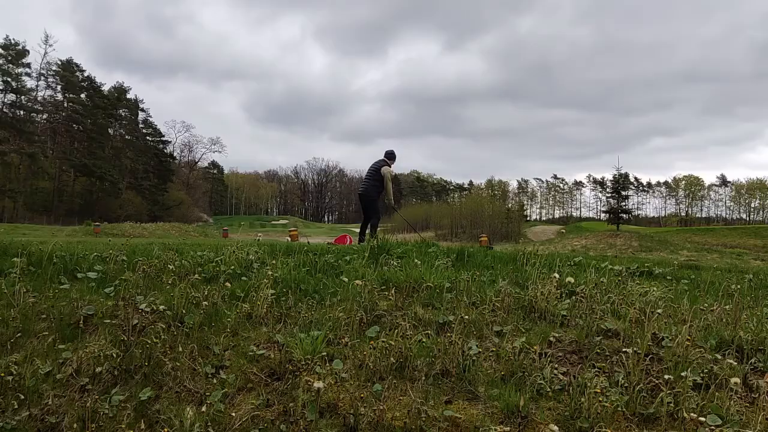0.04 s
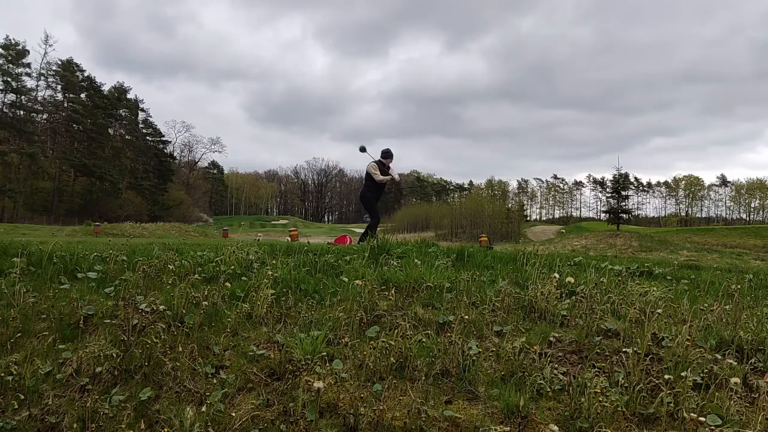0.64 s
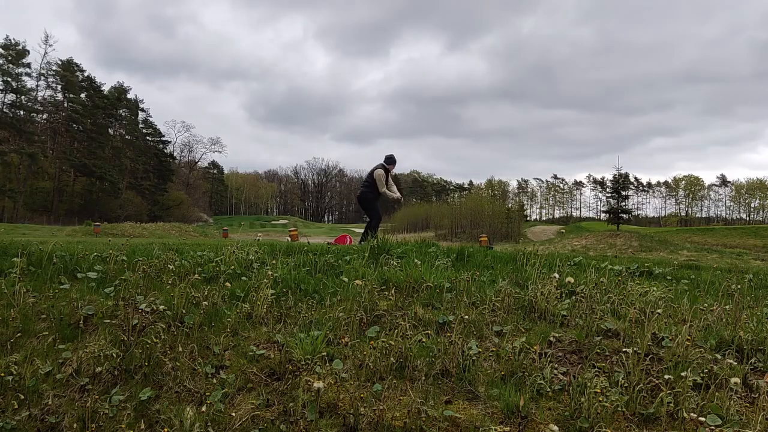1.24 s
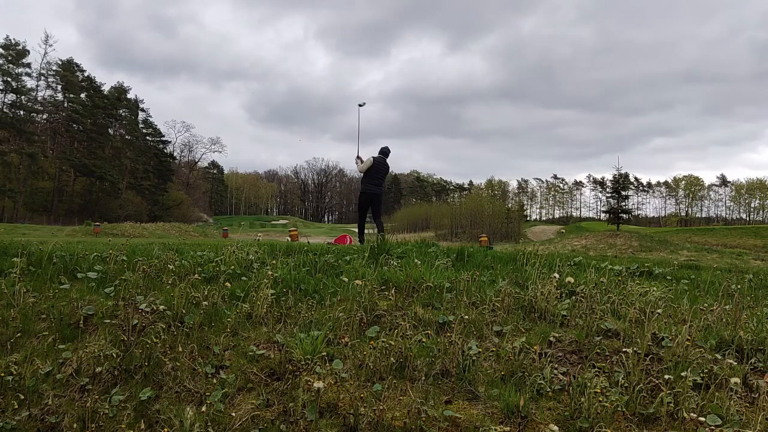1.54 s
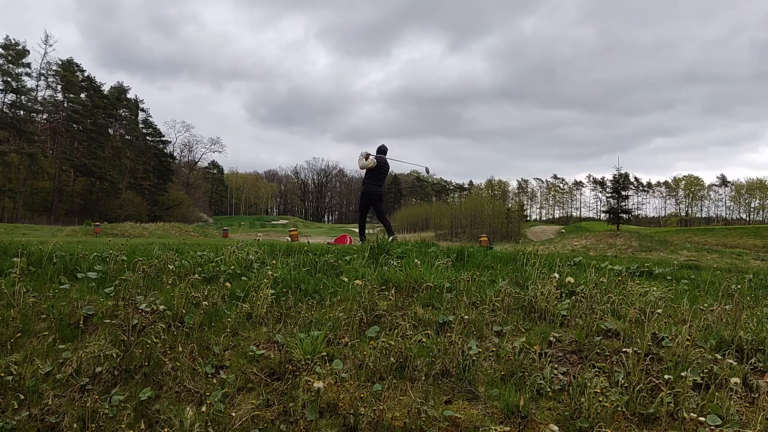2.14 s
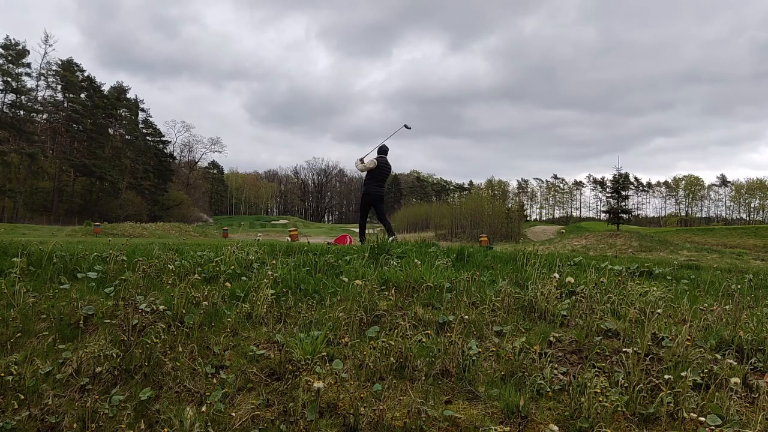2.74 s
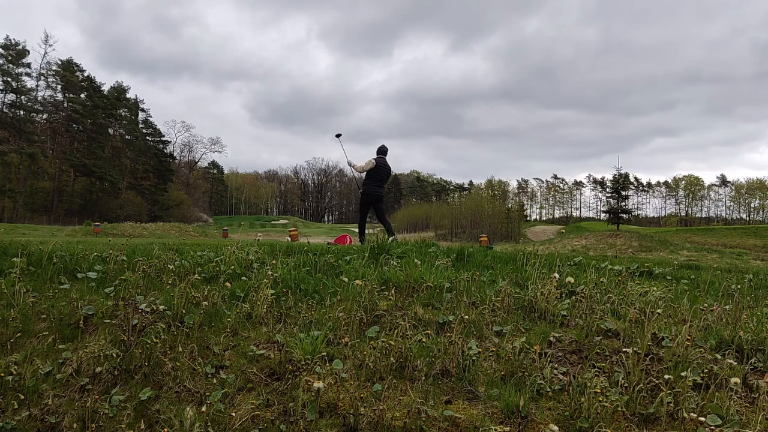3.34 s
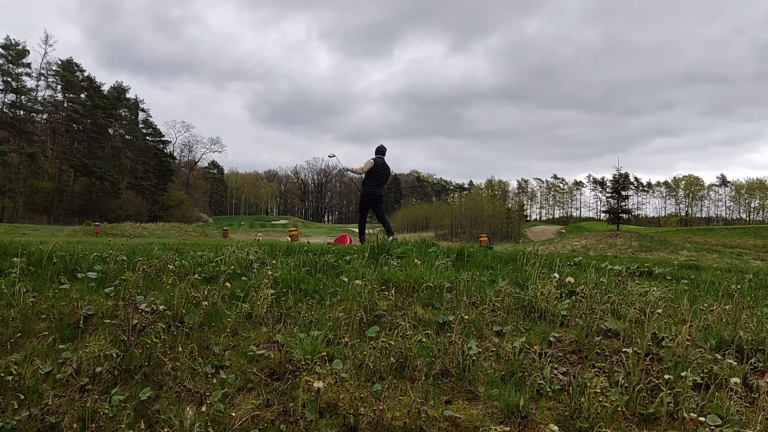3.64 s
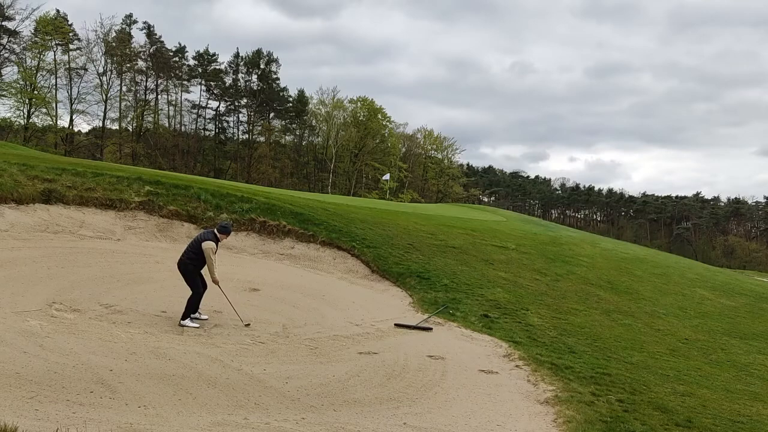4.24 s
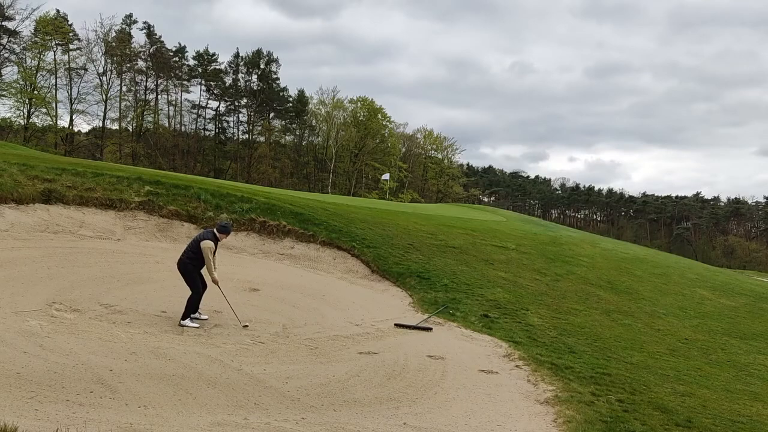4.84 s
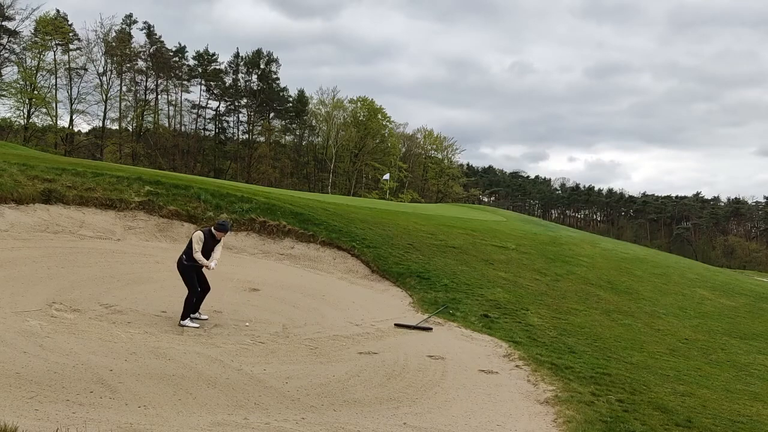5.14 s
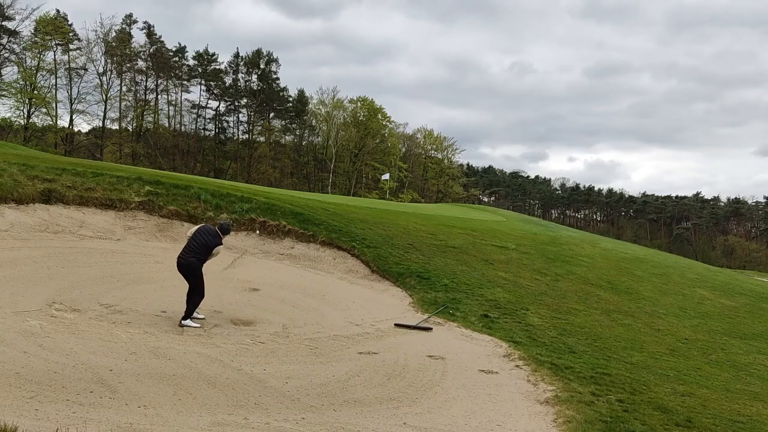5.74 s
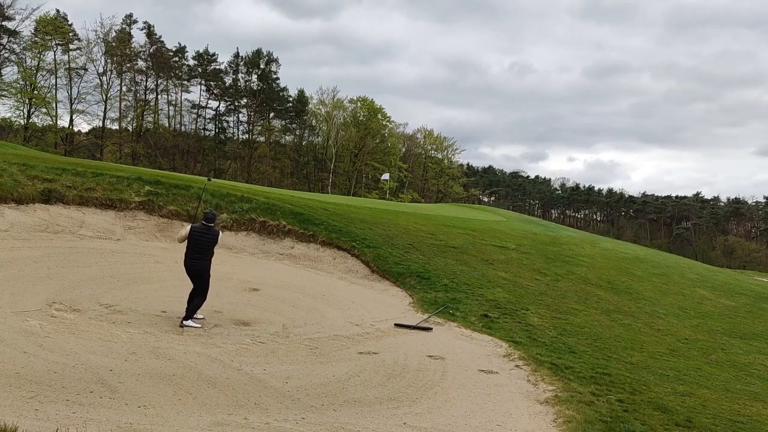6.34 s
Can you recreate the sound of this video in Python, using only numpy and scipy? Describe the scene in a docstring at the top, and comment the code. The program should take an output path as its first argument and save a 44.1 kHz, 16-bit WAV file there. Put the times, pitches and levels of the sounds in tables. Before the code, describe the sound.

Over quiet outdoor air and light birdsong, a short club whoosh leads into the sharp crack of a golf drive, with a brief ring and an echo from nearby woods. Birds pipe and buzz afterwards. The sound then switches suddenly to a bunker, where low gusts buffet the microphone, a bird whistles once, and a quieter wedge shot scatters sand. Clothing rustles softly with both swings.

```python
"""Two golf shots near woods.

At the tee, small birds sing while a driver whooshes down and cracks the ball; its hollow head
rings and the trees scatter the crack back. The scene then cuts to a bunker, where wind buffets
the microphone and a wedge knocks the ball out in a spray of sand. Clothes swish with each swing."""
import sys
import numpy as np
from scipy import signal
from scipy.fft import rfft, irfft, next_fast_len
from scipy.io import wavfile
from scipy.ndimage import uniform_filter1d

SR = 44100
rng = np.random.default_rng(int(sys.argv[2]) if len(sys.argv) > 2 else 0)


def unload_audio(sound):
    """Save the sound as a 16-bit wav file, at the path given as the first command line argument."""
    columns = np.transpose(np.atleast_2d(sound))
    # keep every value between -1 and 1, then stretch to whole-number steps
    steps = np.round(np.clip(columns, -1, 1) * 32767)
    wavfile.write(sys.argv[1], SR, steps.astype(np.int16))


N = 281342
TIME_S = np.arange(N) / SR
FFT_SIZE = next_fast_len(N, real=True)
BIN_HZ = np.fft.rfftfreq(FFT_SIZE, 1 / SR)
DRIVE_S, CUT_S, WEDGE_S = 1.4131, 4.09, 5.7351


def amp(db):
    """Decibels to gain."""
    return 10 ** (np.asarray(db) / 20)


def unit_rms(x):
    """Scales to rms 1."""
    return x / np.sqrt(np.mean(x ** 2) + 1e-20)


def curve_at(points, hz):
    """Interpolates a table on a log-frequency axis."""
    point_hz, value = np.transpose(points)
    return np.interp(np.log(hz + 1), np.log(point_hz + 1), value)


def pan(left_db):
    """Stereo gains for a left-over-right level difference."""
    gains = amp(np.array([[.5], [-.5]]) * left_db)
    return gains / np.sqrt(np.mean(gains ** 2, axis=0))


def noise(spectrum, correlation=0):
    """Stereo noise of rms 1 with a given spectrum and left-right correlation."""
    left, spare = rng.standard_normal((2, FFT_SIZE))
    right = correlation * left + np.sqrt(1 - correlation ** 2) * spare
    shaped = rfft([left, right]) * amp(curve_at(spectrum, BIN_HZ))
    return unit_rms(irfft(shaped, FFT_SIZE)[:, :N])


def burst(peak_s, rise_s, fall_s):
    """Envelope that grows and dies exponentially about its peak."""
    return np.exp(-np.maximum((peak_s - TIME_S) / rise_s, (TIME_S - peak_s) / fall_s))


def place(x, start_s):
    """Puts a mono sound on the timeline."""
    return np.pad(x, (round(start_s * SR), N))[:N]


def pulse(spectrum, start_s, size=8192):
    """One minimum-phase pressure pulse of peak 1."""
    log_gain = np.log(amp(curve_at(spectrum, abs(np.fft.fftfreq(size, 1 / SR)))))
    shape = np.fft.ifft(np.exp(np.conj(signal.hilbert(log_gain)))).real
    return place(shape / abs(shape).max(), start_s)


def ring(modes, strike_s):
    """Struck modes decay, reaching each channel in a random phase."""
    age_s = TIME_S - strike_s
    live = (age_s > 0) & (age_s < 1)
    out, t = np.zeros((2, N)), age_s[live]
    for hz, db, t60_s in modes:
        out[:, live] += amp(db - 60 * t / t60_s) * np.sin(2 * np.pi * (hz * t + rng.random((2, 1))))
    return out


# Open-air spectra at the two spots. Each row: frequency in Hz, relative level in dB.
TEE_AIR_SPECTRUM = [(12, -30.5), (20, 5), (33, -13), (66, -11.5), (161, -23.5), (196, -27.5), (231, -25.5),
                    (389, -29), (471, -28.5), (620, -30.5), (1860, -38.5), (4360, -39.3), (7340, -42),
                    (8900, -38), (14200, -43)]
BUNKER_AIR_SPECTRUM = [(100, 13), (400, 10), (1000, 2.5), (2500, -1), (5000, -2.3), (7500, -4), (8700, 0),
                       (9800, -3.5), (11000, -0.5), (12500, -3.5), (14200, -7)]


def open_air():
    """Steady background noise, as a pair: tee, bunker."""
    return (amp(-57.7) * noise(TEE_AIR_SPECTRUM, correlation=.2),
            amp(-66) * noise(BUNKER_AIR_SPECTRUM, correlation=.087))


# Gusts. Each row: peak time in seconds, half length in seconds, level in dB, left over right in dB.
WIND_GUSTS = [(4.14, .06, -43, 18), (4.34, .07, -49, 14), (4.44, .06, -48.5, -9), (4.72, .13, -49.5, -3),
              (4.855, .02, -49, -4), (5.037, .03, -44, 10), (5.48, .13, -48, -16), (5.78, .13, -51, 1),
              (6.055, .06, -40.5, 23), (6.21, .07, -40.5, 12)]
# Wind on the microphone. Each row: frequency in Hz, relative level in dB.
BUFFET_SPECTRUM = [(10, -5), (25, 3.5), (55, -1.5), (100, -12), (160, -21.5), (250, -34), (500, -69),
                   (1500, -78)]


def wind(breeze_db=-56, eddy_db=1.2):
    """A breeze and gusts, broken into short eddies, buffet each microphone port separately."""
    power = amp(breeze_db) ** 2
    for peak_s, half_s, db, left_db in WIND_GUSTS:
        power = power + (amp(db) * pan(left_db)) ** 2 * np.exp(-((TIME_S - peak_s) / half_s) ** 2)
    eddies = uniform_filter1d(rng.standard_normal((2, N)), size=1500)
    eddies = unit_rms(uniform_filter1d(eddies, size=900))
    return np.sqrt(power) * unit_rms(amp(eddy_db * eddies) * noise(BUFFET_SPECTRUM))


# Echo colour. Each row: frequency in Hz, relative level in dB.
ECHO_SPECTRUM = [(100, -13), (300, -12.5), (650, -8.5), (1200, -14.7), (2400, -4), (4000, 3.2), (6300, 2.8),
                 (9000, 3.3), (11000, -3.5), (14000, -6)]
# Echo decay. Each row: frequency in Hz, T60 in seconds.
ECHO_DECAY = [(200, .9), (600, .72), (1200, 1), (3000, 1), (5000, 0.74), (8000, .53), (13000, 0.56)]
# Echo balance. Each row: frequency in Hz, left over right in dB.
ECHO_PAN = [(600, 0), (4000, 0.5), (8000, -6), (11000, -1.5), (14000, 5)]


def woods(x, delay_s=.013, build_s=.003, clump_db=2, bank_s=.031):
    """Trunks and turf scatter a sound into a tail of clumped echoes, whose treble dies first."""
    hz, t, bins = signal.stft(rng.standard_normal((2, SR)), SR, nperseg=256)
    clumps = uniform_filter1d(rng.standard_normal(bins.shape[1:]), size=3, axis=1)
    clumps = unit_rms(uniform_filter1d(clumps, size=24, axis=0))
    colour = amp(curve_at(ECHO_SPECTRUM, hz)) * pan(curve_at(ECHO_PAN, hz))
    decay_db = 60 * t / curve_at(ECHO_DECAY, hz)[:, None]
    bins = bins * colour[:, :, None] * amp(clump_db * clumps - decay_db)
    tail = signal.istft(bins, SR, nperseg=256)[1][:, :SR]
    age_s = TIME_S[:SR]
    tail *= 1 - np.exp(-np.maximum(age_s - delay_s, 0) / build_s)
    # The nearest bank, on the right, throws back one stronger cluster.
    tail *= 1 + amp(-7.5) * pan(-20) * np.exp(-((age_s - bank_s) / .01) ** 2)
    return signal.oaconvolve(x, tail / np.sqrt(SR / 20), axes=1)[:, :N]


def whistle(start_s, hz, level, buzz=0, rasp=0, buzz_hz=372):
    """A bird's tone along a pitch curve; a fast, even wobble makes it buzz, an uneven one rasp."""
    t = TIME_S[:len(hz)]
    waver = unit_rms(uniform_filter1d(rng.standard_normal(len(t)), size=70))
    hz = hz * (1 + buzz * np.sin(2 * np.pi * buzz_hz * t) + rasp * waver)
    return place(np.sqrt(2) * level * np.sin(2 * np.pi * np.cumsum(hz) / SR), start_s)


def note(start_s, length_s, hz, db, glide=0, arch=0, buzz=0, rasp=0, skew=1):
    """A bird's note swells and fades as its pitch glides and arches; skew above 1 delays the swell."""
    progress = np.linspace(0, 1, round(length_s * SR))
    centred = 2 * progress - 1
    pitch_hz = hz * (1 + glide * centred / 2 - arch * centred ** 2)
    return whistle(start_s, pitch_hz, amp(db) * np.sin(np.pi * progress ** skew), buzz, rasp)


def perch(song, left_db, echo_db):
    """Places a bird to one side, with its echo from the trees."""
    return song * pan(left_db) + amp(echo_db) * woods(song[None], delay_s=.003)


def twitter(start_s, end_s, low_hz, top_db, count):
    """One bout of short bird notes, random in timing, pitch, glide and level."""
    jitter, pitch, slope, softness = rng.random((count, 4)).T
    times_s = start_s + (end_s - start_s) * (np.arange(count) + jitter) / count
    notes = zip(times_s, low_hz * (1 + .25 * pitch), top_db - 6 * softness, .4 * (slope - .5))
    return sum(note(s, .035, hz, db, glide, buzz=.05, rasp=.03) for s, hz, db, glide in notes)


def treetop_birds():
    """Far birds twitter in bouts, with a strong echo."""
    song = (twitter(0, .6, low_hz=3600, top_db=-74, count=7)
            + twitter(.6, 1.35, low_hz=3650, top_db=-70, count=14)
            + twitter(3.55, 4.02, low_hz=3550, top_db=-68, count=10)
            + twitter(4.1, 4.36, low_hz=2850, top_db=-72, count=4)
            + twitter(5.38, 5.42, low_hz=5900, top_db=-66, count=2))
    return perch(song, left_db=-3, echo_db=-2.5)


# Chips. Each row: start in seconds, level in dB.
CHIP_NOTES = [(.388, -68.5), (.441, -64.5), (.504, -69), (.935, -66)]


def chipping_bird(hz=3830):
    """Short, clean chips, all on the same falling pitch."""
    song = sum(note(s, .026, hz, db, glide=-.18, rasp=.004) for s, db in CHIP_NOTES)
    return perch(song, left_db=4, echo_db=-7)


def whistling_bird(start_s=5.098, length_s=.175, top_hz=6150, knee_hz=4000, sag_hz_per_s=2100):
    """One whistle starts high, drops quickly, then sinks slowly."""
    t = np.arange(0, length_s, 1 / SR)
    hz = knee_hz + (top_hz - knee_hz) / (1 + (t / .028) ** 3) - sag_hz_per_s * t
    level = amp(-63.7) * np.sin(np.pi * (t / length_s) ** .8) ** .5
    return perch(whistle(start_s, hz, level, rasp=.009), left_db=-9, echo_db=-3.5)


# Slurs. Each row: start in seconds, pitch in Hz, glide as a share of pitch, level in dB.
SLUR_NOTES = [(.738, 4695, .18, -59), (.868, 4850, .25, -59), (1.272, 4850, .2, -58),
              (2.125, 3900, .05, -64.5), (3.5, 4000, -.22, -66), (3.668, 4100, .12, -58.5),
              (3.83, 4100, -.25, -63), (3.998, 4250, .1, -58)]


def slurring_bird():
    """A distant bird slurs raspily up and down, blurred by the woods."""
    song = sum(note(s, .06, hz, db, glide, arch=.012, buzz=.055, rasp=.03)
               for s, hz, glide, db in SLUR_NOTES)
    return perch(song, left_db=-8, echo_db=-7)


# Piping notes. Each row: start in seconds, pitch in Hz, level in dB.
PIPE_NOTES = [(1.849, 4410, -58), (2.016, 4300, -58.5), (2.189, 4430, -58), (2.362, 4360, -63.5)]


def piping_bird():
    """A bird on the right pipes soft, arched notes."""
    song = sum(note(s, .052, hz, db, glide=.01, arch=.03, buzz=.008, rasp=.009)
               for s, hz, db in PIPE_NOTES)
    return perch(song, left_db=-9, echo_db=-7.5)


# Calls. Each row: start and length in seconds, pitch in Hz, arch as a share of pitch, level in dB.
HIGH_NOTES = [(.452, .036, 7150, .03, -60), (1.013, .034, 7080, .04, -48), (3.164, .057, 8250, -.04, -50.5)]


def high_bird():
    """Thin, falling calls far to the right."""
    song = sum(note(s, length_s, hz, db, glide=-.1, arch=arch, buzz=.02, rasp=.011)
               for s, length_s, hz, arch, db in HIGH_NOTES)
    return perch(song, left_db=-18, echo_db=-8)


# Buzzes. Each row: beat in seconds, pitch in Hz.
BUZZ_NOTES = [(3.221, 4875), (3.403, 4870), (3.564, 4810), (3.735, 4786), (3.897, 4886), (4.052, 4970)]


def buzzing_bird(full_db=-41, swell_s=.5, lead_s=.01, stretch_s_per_db=.0011):
    """A near bird on the left repeats a buzzy note in a crescendo; louder notes last longer."""
    song = np.zeros(N)
    first_s = BUZZ_NOTES[0][0]
    for beat_s, hz in BUZZ_NOTES:
        offset_db = -21 * np.exp((first_s - beat_s) / swell_s)
        length_s = lead_s + .075 + stretch_s_per_db * offset_db
        song += note(beat_s - lead_s, length_s, hz, full_db + offset_db,
                     arch=-.012, buzz=.046, rasp=.008, skew=1.5)
    return perch(song, left_db=4, echo_db=-14)


def rustle(spectrum, envelope, grain_db, left_db):
    """A grainy hiss that follows an envelope."""
    grain = unit_rms(uniform_filter1d(rng.standard_normal(N), size=130))
    return noise(spectrum) * envelope * amp(grain_db * grain) * pan(left_db)


# Swings. Each row: backswing peak and half length in seconds, its level in dB,
# downswing peak in seconds, its level in dB.
SWING_SWISHES = [(.7, .17, -64.5, 1.39, -55.5), (5.27, .13, -63, 5.72, -63)]
# Jacket rubs. Each row: peak time in seconds, level in dB.
JACKET_RUBS = [(.597, -57.5), (.662, -56.5), (.72, -63), (1.135, -61), (1.218, -66)]
# Hiss of cloth, also of the wedge's scuff. Each row: frequency in Hz, relative level in dB.
FRICTION_SPECTRUM = [(1000, -14), (2500, -13.5), (4500, -11.5), (7000, -7.5), (8700, 0), (9700, -8),
                     (11000, -4.5), (12500, -17.5), (14000, -18)]


def clothes():
    """Cloth swishes with each backswing and downswing; the jacket catches in a few short rubs."""
    swish = np.zeros(N)
    for back_s, half_s, back_db, down_s, down_db in SWING_SWISHES:
        swish += amp(back_db) / np.sqrt(1 + ((TIME_S - back_s) / half_s) ** 4)
        swish += amp(down_db) * burst(down_s, rise_s=.125, fall_s=.045)
    rubs = sum(amp(db) * burst(s, rise_s=.012, fall_s=.022) for s, db in JACKET_RUBS)
    return (rustle(FRICTION_SPECTRUM, swish, grain_db=1.2, left_db=-.5)
            + rustle(FRICTION_SPECTRUM, rubs, grain_db=1.8, left_db=-12))


# Falling sand. Each row: frequency in Hz, relative level in dB.
SAND_SPECTRUM = [(1000, -18), (3000, -22), (5000, -17), (7000, -8.5), (8700, 0), (9700, -5.5),
                 (11000, -3.5), (12500, -14), (14000, -18)]


def sand_spray():
    """Fine grains patter down after the wedge, fading out."""
    envelope = amp(-58.7) * burst(5.76, rise_s=.017, fall_s=.29)
    return rustle(SAND_SPECTRUM, envelope, grain_db=2.1, left_db=-.5)


# The sole's thump and the wedge's bite in sand. Each row: frequency in Hz, relative level in dB.
THUMP_SPECTRUM = [(60, 3), (240, 1.5), (450, .5), (700, -7), (1250, -6.5), (3000, -28), (9000, -59)]
BITE_SPECTRUM = [(150, -4), (400, 2.5), (900, -2), (1300, -3), (2600, -15), (3300, -19), (4400, -34),
                 (5800, -14), (8500, -3), (10000, -4.5), (11800, 1.5), (14000, -25)]
# Blade modes. Each row: frequency in Hz, relative level in dB, T60 in seconds.
BLADE_MODES = [(3280, 7, .015), (8300, -7, 0.035), (8930, -5, 0.064), (9860, 4.5, 0.028), (10480, -4, .035),
               (11150, -5, 0.034)]


def wedge():
    """The sole scuffs and thumps into the sand, then the blade clicks on the ball and rings."""
    thump = amp(-36) * noise(THUMP_SPECTRUM, correlation=.9) * burst(5.7335, .00066, .0066)
    scuff = amp(-43) * noise(FRICTION_SPECTRUM, correlation=.3) * burst(5.733, .0003, .009)
    bite = amp(-29.5) * noise(BITE_SPECTRUM, correlation=.54) * burst(WEDGE_S + .00038, .00048, .0025)
    strike = thump + scuff + bite + amp(-35) * ring(BLADE_MODES, WEDGE_S)
    return strike + amp(-33.5) * woods(strike)


def shaft_whoosh():
    """Eddies shed by the driver's shaft flutter once, then hum louder as the downswing speeds up."""
    spectrum_hz_db = [(100, -25.5), (300, -10.5), (500, -2), (640, 1), (820, -20), (1300, -16.5),
                      (3000, -34), (8000, -51)]
    flutter = amp(-56) * burst(1.327, rise_s=.0032, fall_s=.02)
    downswing = amp(-49.5) * burst(1.397, rise_s=.043, fall_s=.028)
    return noise(spectrum_hz_db, correlation=.8) * (flutter + downswing)


# Air pushed out between face and ball, and the face's crack.
# Each row: frequency in Hz, relative level in dB.
BLOW_SPECTRUM = [(40, -36), (120, -19.5), (200, -11.5), (330, -3), (500, 0.5), (780, -2.7), (1050, -.7),
                 (1400, -2.5), (2000, -9), (2900, -24.5), (5000, -20.5), (14000, -26.5)]
CRACK_SPECTRUM = [(1500, -32.5), (2900, -34), (3300, -18.5), (4600, -15.5), (5200, -7), (6500, -5),
                  (7300, -4), (9000, -0.5), (11200, -2.5), (12400, -16), (13300, -9.5), (14200, -19.5)]
# Modes of the hollow head. Each row: frequency in Hz, relative level in dB, T60 in seconds.
HEAD_MODES = [(4290, -18.5, .04), (4770, -12.5, .04), (5200, -15, .05), (5850, -12, .025), (5960, -13, .03),
              (6750, -12, 0.076), (6970, -14.5, .04), (7230, -37, 1.6), (7600, -5, 0.033),
              (8200, -6, 0.046), (8830, -6.5, 0.028), (8880, -1.5, .03), (9560, -3.5, .025),
              (10850, -7, 0.01), (10400, 0, .025), (10800, -6, 0.019), (11150, -5.5, .03),
              (10700, -11, .03), (14200, -9.5, .03)]
# Balance of ring and crack. Each row: frequency in Hz, left over right in dB.
HEAD_PAN = [(5000, -5), (7500, -4.5), (9500, 0), (12000, 3.5)]


def driver(swell_s=.0036, facing_s=.011, turned_db=-11):
    """A blow of air, a crack and the ringing head, which faces the listener briefly, then swings on."""
    age_s = np.maximum(TIME_S - DRIVE_S, 0)
    facing = amp(turned_db) + (1 - amp(turned_db)) / (1 + (age_s / facing_s) ** 12)
    head = amp(-12.5) * ring(HEAD_MODES, DRIVE_S) * (1 - np.exp(-(age_s / swell_s) ** 2))
    crack = amp(-13.5) * noise(CRACK_SPECTRUM) * burst(DRIVE_S + .0004, rise_s=.0001, fall_s=.016)
    metal_bins = rfft((head + crack) * facing, FFT_SIZE) * pan(curve_at(HEAD_PAN, BIN_HZ))
    metal = irfft(metal_bins, FFT_SIZE)[:, :N]
    # The blow arrives on the left first.
    blow = np.array([pulse(BLOW_SPECTRUM, DRIVE_S + lag_s) for lag_s in (.00008, .00014)])
    strike = amp(-5) * blow * pan(-1.7) + metal
    return strike + amp(-3) * woods(strike)


def scene():
    """The tee, then an abrupt cut to the bunker."""
    tee_air, bunker_air = open_air()
    tee_birds = chipping_bird() + slurring_bird() + piping_bird() + buzzing_bird()
    tee = tee_air + tee_birds + shaft_whoosh() + driver()
    bunker = bunker_air + wind() + whistling_bird() + sand_spray() + wedge()
    return np.where(TIME_S < CUT_S, tee, bunker) + treetop_birds() + high_bird() + clothes()


def record(dry, cutoff_hz=14300):
    """A steep low-pass removes the top treble."""
    lowpass = signal.firwin(401, cutoff_hz, window=("kaiser", 7), fs=SR)
    return signal.oaconvolve(dry, lowpass[None], "same")


dry = scene()
out = record(dry)
unload_audio(out)
```